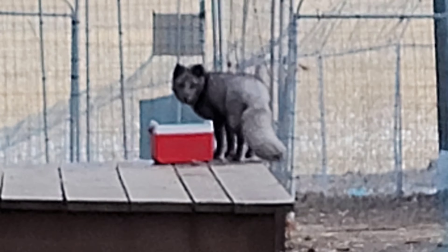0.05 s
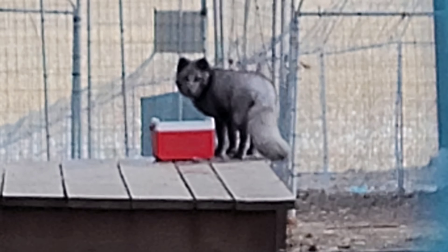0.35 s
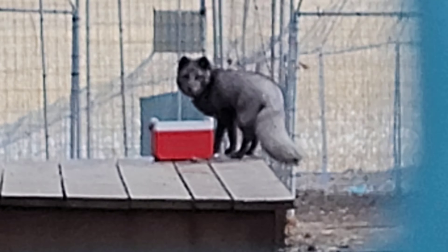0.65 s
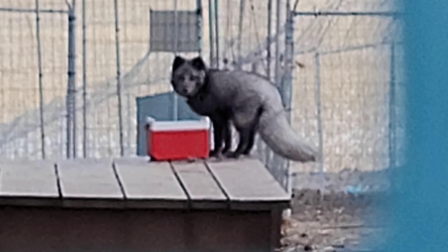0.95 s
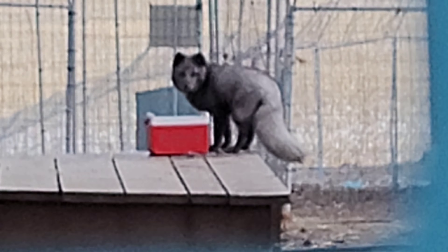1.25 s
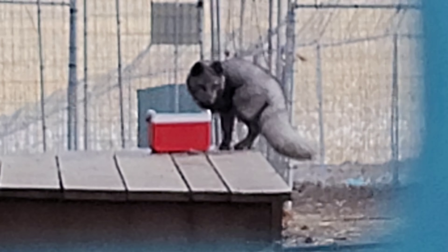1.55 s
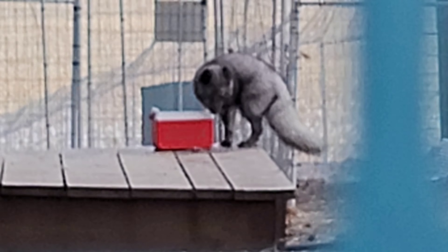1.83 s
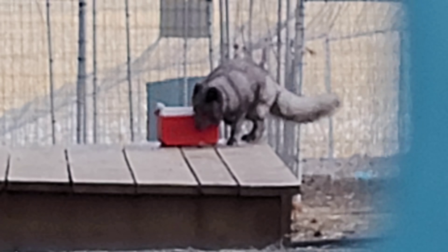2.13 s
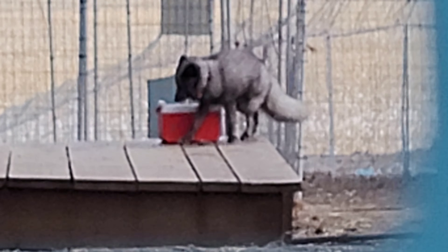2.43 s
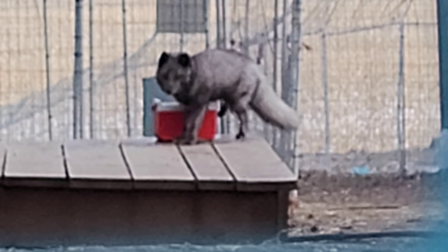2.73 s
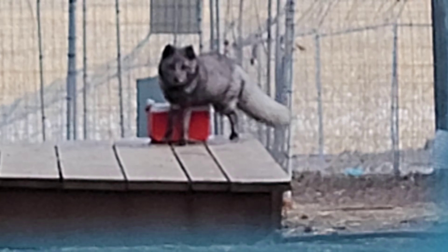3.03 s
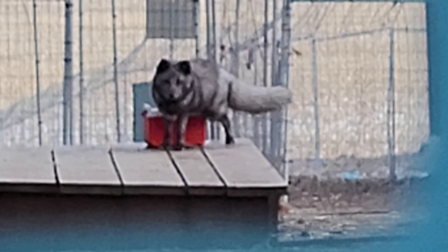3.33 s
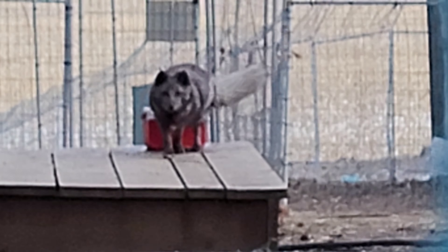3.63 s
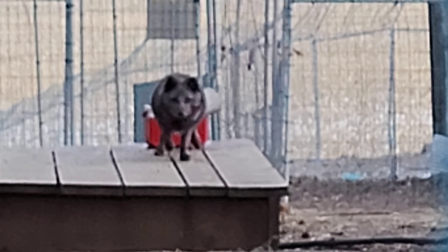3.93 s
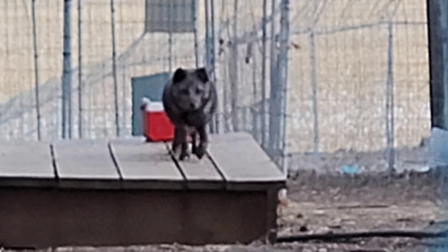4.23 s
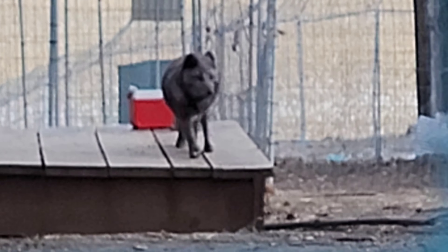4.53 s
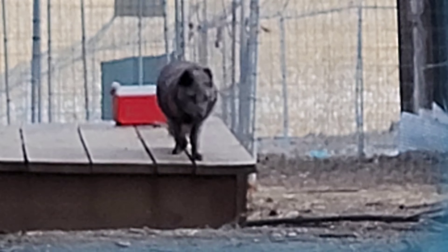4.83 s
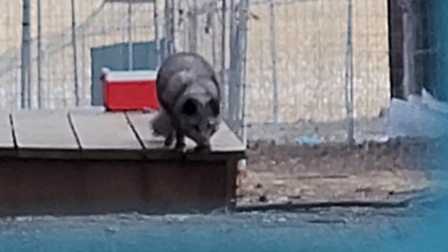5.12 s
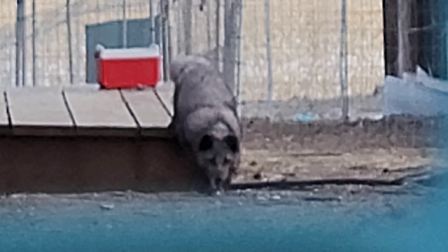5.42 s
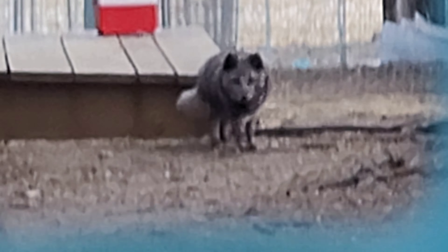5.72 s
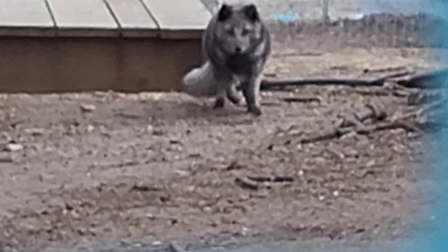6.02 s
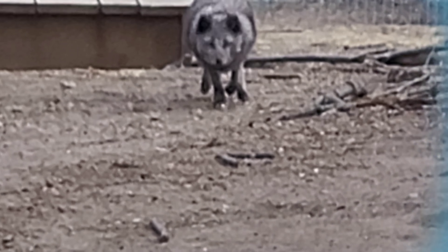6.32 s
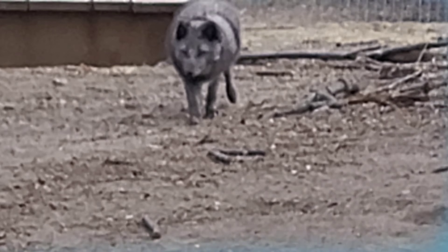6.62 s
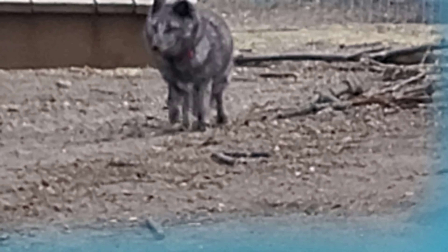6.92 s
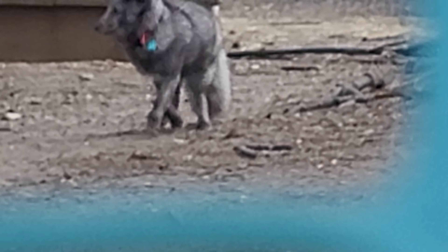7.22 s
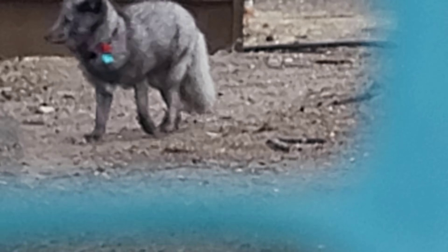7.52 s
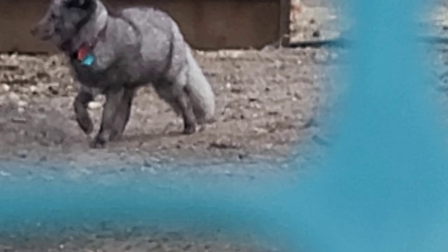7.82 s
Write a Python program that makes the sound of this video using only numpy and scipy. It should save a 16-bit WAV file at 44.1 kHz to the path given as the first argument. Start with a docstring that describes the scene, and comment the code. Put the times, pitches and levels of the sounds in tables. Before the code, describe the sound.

A fox screams seven times in an outdoor pen, a little to the left. Each shrill call scoops up, breaks into a rasp, clears and falls away, with a light echo off nearby walls. Low wind and handling rumble runs underneath, with a few dull knocks and a sharp dry tap. Later come faint collar tag ticks and tiny bird chips, and distant traffic swells on the right around the final scream.

```python
"""A fox screams seven times in an outdoor pen: each call rises, breaks into a rasp, clears and falls away.
Its vocal folds pass between a clean whistle and chaotic flapping.
The fox screams from the left, and nearby walls answer from both sides.
Air and handling rumble on the microphone while distant traffic swells on the right.
Around the screams come dull knocks, a few dry taps, the ticking collar tag and a small bird's chips."""
import sys
import numpy as np
from scipy import signal
from scipy.fft import rfft, irfft, next_fast_len
from scipy.io import wavfile
from scipy.ndimage import uniform_filter1d, map_coordinates

SR = 44100
rng = np.random.default_rng(int(sys.argv[2]) if len(sys.argv) > 2 else 0)


def to_wav(sig):
    """Store sig (one row per channel, or 1-D mono) as 16-bit WAV at the path in sys.argv[1].

    Samples outside -1..1 are clipped; the rate is SR.
    """
    pcm = np.clip(np.atleast_2d(sig), -1, 1) * 32767
    pcm = np.round(pcm).astype(np.int16)
    wavfile.write(sys.argv[1], SR, pcm.T)  # frames by channels


N = 355446
T = np.arange(N) / SR


def amp(db):
    """Decibels to gain."""
    return np.exp(np.asarray(db) * (np.log(10) / 20))


def unit(x):
    """Scale to rms 1."""
    return x / np.sqrt(np.mean(x ** 2) + 1e-20)


def steady(x):
    """Hold the running rms at 1."""
    return x / np.sqrt(np.abs(uniform_filter1d(x * x, size=1300)) + 1e-9)


def along(points, hz):
    """Read (freq_hz, value) points on a log frequency axis."""
    freqs, values = np.transpose(points)
    return np.interp(np.log(hz + 1), np.log(freqs + 1), values)


def curves(rows):
    """An automation curve for each column after the time."""
    times, *columns = np.transpose(rows)
    return [np.interp(T, times, column) for column in columns]


def wobble(rate):
    """A smooth random curve of rms 1, with rate knots a second."""
    knots = rng.standard_normal(int(N * rate / SR) + 4)
    fine = np.arange(0, len(knots) - 1, .125)
    return unit(np.interp(T * rate, fine, map_coordinates(knots, [fine])))


def filtered(x, response):
    """Filter x by a function of frequency."""
    size = next_fast_len(N + SR // 2)
    return irfft(rfft(x, size) * response(np.fft.rfftfreq(size, 1 / SR)), size)[..., :N]


def eq(x, spectrum):
    """Colour x with (freq_hz, gain_db) points."""
    return filtered(x, lambda hz: amp(along(spectrum, hz)))


def noise(spectrum, count=2):
    """Unrelated coloured noises of rms 1."""
    return unit(eq(rng.standard_normal((count, N)), spectrum))


def resonance(x, centre_hz, width_hz):
    """A resonance whose centre moves from sample to sample."""
    turn = np.exp(2j * np.pi * np.cumsum(centre_hz) / SR)
    pole = np.exp(-np.pi * width_hz / SR)
    return 2 * np.real(turn * signal.lfilter([1 - pole], [1, -pole], x / turn))


def add(track, start_s, sound):
    """Mix a short sound into the track."""
    part = track[..., round(start_s * SR):][..., :len(sound)]
    part += sound[:part.shape[-1]]


def bursts(rows, t60_s, spectrum):
    """A decaying burst of coloured noise for each (start_s, level_db) row."""
    blows, t = np.zeros(N), np.arange(SR // 4) / SR
    for start_s, level_db, *_ in rows:
        add(blows, start_s, amp(level_db - 60 * t / t60_s) * rng.standard_normal(len(t)))
    return eq(blows, spectrum)


def placed(x, lead_ms):
    """Pan by arrival time: the left microphone is reached earlier by lead_ms."""
    return filtered(x, lambda hz: np.exp(1j * np.pi * hz * lead_ms / 1000 * np.array([[1], [-1]])))


def effort():
    """The screams scoop up, strain, clear, sag and drop: their contours, mouth shapes and gate."""
    # one contour per scream: time_s, pitch_hz, level_db, roughness (0-1), second_harmonic_db, edge_db
    screams = [
        [(0, 1295, -38.5, 0.56, 0, -14.5), (0.09, 1282, -40.5, 0.1, 0, -14), (0.112, 1122, -43, 0.5, 0, -9),
         (0.14, 944, -60, 0.5, -2, -16)],
        [(0.455, 885, -45, 0, -27, -21), (0.495, 1036, -37, 0.15, -27, -18),
         (0.52, 1075, -39, 0.39, -22, -16.5), (0.57, 1145, -36.5, 0.77, -16, -17),
         (0.65, 1480, -37, 0.6, -6.5, -19.5), (0.74, 1415, -34.5, 0.6, -6.5, -22),
         (0.92, 1409, -42, 0.71, -10, -20.5), (1.01, 1289, -34.5, 0.29, -20, -24),
         (1.085, 1234, -43, 0.23, -5.5, -20), (1.13, 1047, -54, 0.5, -4, -10)],
        [(1.425, 1005, -48, 0.51, -14, -23.5), (1.49, 1253, -37.5, 0.97, -9, -18.5),
         (1.58, 1380, -40.5, 0.98, -4, -17.5), (1.67, 1411, -38.5, 0.74, -22, -12.5),
         (1.76, 1314, -37, 0.37, -18, -18.5), (1.85, 1262, -44, 0.4, -9, -20),
         (1.91, 1258, -30.5, 0.12, -14.5, -30), (2.0, 1240, -39, 0.23, -12, -24.5),
         (2.03, 1132, -51, 0.42, -3, -15)],
        [(2.395, 810, -59, 0.09, 3, -18), (2.425, 944, -52, 0.13, 2, -18), (2.452, 1180, -38, 0.18, -11, -20),
         (2.475, 1279, -33, 0.66, -13, -18), (2.53, 1397, -31.5, 0.84, -15, -16.5),
         (2.62, 1459, -30, 0.77, -7.5, -21), (2.72, 1341, -34.5, 0.38, -2, -17.5),
         (2.85, 1266, -38.5, 0.32, -7.5, -15.5), (2.92, 1179, -36.5, 0.5, -2, -21.5),
         (2.965, 880, -50, 0.51, 8, -20.5)],
        [(3.725, 950, -52, 0.8, -25, -16), (3.79, 1217, -29.5, 0.92, -23, -13),
         (3.87, 1301, -26, 0.89, -22, -20.5), (3.97, 1397, -29, 0.75, -7, -18.5),
         (4.04, 1339, -33.5, 0.46, -5.5, -14.5), (4.18, 1273, -39.5, 0.38, -0.5, -15),
         (4.28, 1159, -34, 0.38, -8.5, -19), (4.33, 901, -50, 0.52, 8, -29)],
        [(4.925, 915, -57, 0.07, -12, -7), (4.965, 1050, -39, 0.12, -12, -18), (5.0, 1170, -30, 0.42, -22, -24),
         (5.055, 1327, -32.5, 0.66, -12.5, -16), (5.11, 1288, -35.5, 0.38, -5, -19),
         (5.24, 1254, -39.5, 0.27, -10, -19), (5.31, 1148, -37.5, 0.44, -7.5, -20.5),
         (5.38, 940, -50, 0.35, 14, -16)],
        [(6.93, 950, -45.5, 0.82, -1, -9), (7.0, 1139, -29, 0.93, -15, -13.5), (7.08, 1231, -30, 0.94, -9, -13),
         (7.17, 1407, -30, 0.93, -11, -14), (7.26, 1418, -29.5, 0.72, -14, -15.5),
         (7.35, 1318, -35, 0.39, -3.5, -14), (7.52, 1237, -35, 0.4, -8.5, -17.5),
         (7.66, 1110, -40.5, 0.36, -3, -15), (7.76, 923, -45.5, 0.43, 7, -8)],
    ]
    # one mouth shape per scream: second_formant_db, third_formant_db, edge_top_db, snarl_db
    mouth_shapes = [(-0.5, 2.5, -2, -4), (-2.5, 4, 5, 6.5), (-1.5, -1, 6.5, -4), (-1.5, 2, -7.5, 4),
                    (-3, -5, -3, 3.5), (-3.5, -3, -1, -2), (-0.5, -4, -3, -2.5)]
    fade_s = 0.0036
    starts, ends = np.array([(rows[0][0], rows[-1][0]) for rows in screams]).T
    current = np.maximum(np.searchsorted(starts, T) - 1, 0)
    gate = np.clip(np.minimum(T - starts[current], ends[current] - T) / fade_s, 0, 1)
    return curves(np.concatenate(screams)), np.array(mouth_shapes)[current].T, gate


def puffs(phase):
    """Each opening of the vocal folds lets out a puff of random strength."""
    return (1 + 1.6 * np.cos(phase)) * rng.standard_normal(N) * amp(1.4 * wobble(420))


def harmonics(phase, partials):
    """A stack of (harmonic, level_db) partials, each wavering in strength on its own."""
    return sum(amp(db + 2 * wobble(25)) * np.sin(k * phase) for k, db in partials)


def throat(x, gains_db, strain_hz):
    """Three formants rise and sink with the pitch, each flaring and dropping out on its own."""
    # resonances at full strain: centre_hz, width_hz, level_db, pitch_tracking (Hz per Hz)
    formants = [(1369, 87, 2.5, 0.45), (2070, 265, -7.5, 0.42), (2890, 260, -13.5, 0.39)]
    # the short muzzle radiates little outside the formants: freq_hz, gain_db
    passband = [(400, -32), (750, -18), (1040, -21), (1190, 0), (2980, 0), (3250, -14), (7000, -30)]
    voiced = np.zeros(N)
    for k, (centre_hz, width_hz, level_db, tracking) in enumerate(formants):
        strength = amp(level_db + gains_db[k] + 2 * wobble(60))
        voiced += (-1) ** k * strength * resonance(x, centre_hz + tracking * strain_hz, width_hz)
    return unit(eq(voiced, passband))


def whistle(phase, doubling, second_db):
    """The clean voice: two harmonics that swell and falter."""
    # how well the muzzle radiates the whistle: freq_hz, gain_db
    muzzle = [(850, 3), (1050, -6.5), (1200, 0), (1500, 1.5), (2000, -2.5), (2500, -3), (2850, -0.5)]
    tone = doubling * harmonics(phase, [(1, 0), (2, second_db)])
    tone = steady(filtered(tone, lambda hz: np.clip((hz - 600) / 400, 0, 1)))
    return eq(tone, muzzle) * amp(3.3 * wobble(22) - 1.2)


def shrill_edge(phase, doubling, rough, strain_hz, snarl_db, top_db):
    """The upper harmonics blur into a snarl sooner than the low ones turn to rasp."""
    # upper partials: harmonic, level_db
    partials = [(3, -3), (4, 1), (5, -4), (6, -2)]
    # the mouth's treble colour: freq_hz, gain_db
    mouth = [(2900, -29.5), (3400, 3), (3900, -1.5), (4650, -1.5), (5200, 0.5), (5900, 0), (6700, -7.5),
             (7600, -17.5), (9000, -64.5)]
    blur = np.tanh(1.5 * rough)
    air = puffs(phase)
    snarl_hz = 4540 - 1.2 * strain_hz  # sinks as the pitch rises
    snarl = air + amp(snarl_db) * resonance(air, snarl_hz, width_hz=300)
    tone = steady(eq(doubling * harmonics(phase, partials), mouth))
    edge = np.sqrt(1 - blur) * tone + np.sqrt(blur) * unit(eq(snarl, mouth))
    top = filtered(edge, lambda hz: .5 + .5 * np.tanh((hz - 5960) / 400))
    return edge + (amp(top_db) - 1) * top  # high shelf


def jaw_hiss(phase, edge_level_db):
    """Air through the open jaws: a very faint hiss far under the shrill edge, swelling in short breaths."""
    # breaths: centre_s, half_width_s, level_db
    breaths = [(0.0, 0.11, -77.5), (.75, 0.054, -76), (1.02, 0.099, -71.5), (1.66, 0.075, -75),
               (1.88, .09, -78), (2.62, 0.1, -72), (4.04, 0.038, -62.5), (4.22, .09, -67),
               (7.29, 0.05, -68), (7.52, 0.15, -62.5)]
    # hiss colour: freq_hz, gain_db
    colour = [(7000, -36.5), (8000, -2), (8700, -3.5), (9700, -8.5), (10600, -10.5), (11800, -7.5),
              (14000, -6), (15800, -23.5)]
    surges = sum(amp(db) * np.exp(-.5 * ((T - s) / half_s) ** 2) for s, half_s, db in breaths)
    return (amp(edge_level_db - 30.5) + surges) * unit(eq(puffs(phase), colour))


def fox():
    """Vocal folds pass between a clean whistle and chaotic flapping."""
    contour, mouth_shape, gate = effort()
    pitch_hz, voice_db, rough, second_db, edge_db = contour
    middle_db, third_db, top_db, snarl_db = mouth_shape
    strain_hz = pitch_hz - 1392  # zero at full strain, the height of a scream
    # rough folds lose their pitch from one cycle to the next
    jitter = rough ** 2.6 * (.05 * wobble(500) + .04 * wobble(70)) + .003 * wobble(35)
    # the strained voice breaks back and forth between two nearby pitches
    breaks = .03 * rough ** 2 * np.tanh(4 * wobble(30))
    phase = 2 * np.pi * np.cumsum(pitch_hz * (1 + jitter + breaks)) / SR
    # alternate cycles grow unequal, which puts bands halfway between the harmonics
    doubling = 1 + .4 * rough ** 2 * np.cos(phase / 2 + 1.5 * wobble(250))
    rasp = throat(puffs(phase), (0, middle_db, third_db), strain_hz)
    clean = whistle(phase, doubling, second_db)
    chaos = rough ** 2.4
    body = amp(-0.5) * np.sqrt(1 - chaos) * clean + amp(-2) * np.sqrt(chaos) * rasp
    edge = shrill_edge(phase, doubling, rough, strain_hz, snarl_db, top_db)
    hiss = jaw_hiss(phase, voice_db + edge_db)
    rattle = amp(1.4 * rough * wobble(170))
    voice = amp(voice_db - 2.44) * body + amp(voice_db + edge_db - 4) * edge + hiss
    return voice * rattle * gate


def pen(x, lead_ms, wet_db, send_db=0):
    """Direct sound, reflections scattered by fences and walls, and a thin outdoor tail."""
    # decay of the tail: freq_hz, t60_s
    decay = [(300, 0.047), (1400, 0.55), (2600, 0.64), (6000, 0.27), (12000, 0.058)]
    # reflections from ground and walls: delay_s, level_db
    echoes = [(0.015, -14), (0.112, -26.5), (0.219, -33)]
    hz, t, bands = signal.stft(rng.standard_normal((2, SR)), SR, nperseg=256)
    _, tail = signal.istft(bands * amp(-60 * t / along(decay, hz)[:, None]), SR, nperseg=256)
    tail *= amp(wet_db) / np.linalg.norm(tail[0])
    for delay_s, level_db in echoes:
        scatter = rng.standard_normal((2, 256)) * np.hanning(256)
        start = round(delay_s * SR)
        tail[:, start:start + 256] += amp(level_db + wet_db + 5.5) * scatter / np.linalg.norm(scatter[0])
    wet = signal.fftconvolve((x * amp(send_db))[None], tail, axes=1)[:, :N]
    return placed(x, lead_ms) + wet


def mic_rumble():
    """Moving air and the hand shake the microphone, with a few strong buffets and short low bumps."""
    # the bed of moving air: time_s, deep_db, flutter_db
    bed = [(0.0, -41.5, -56), (0.61, -44.5, -49.5), (1.03, -39.5, -58), (1.19, -42.5, -57.5),
           (1.75, -46.5, -54), (2.15, -38, -51.5), (2.49, -37.5, -51.5), (3.3, -32.5, -48.5),
           (3.77, -43, -53.5), (4.98, -42.5, -55.5), (5.27, -43, -53), (5.46, -41.5, -53.5),
           (6.37, -38.5, -52.5), (6.58, -38.5, -48.5), (6.96, -45, -51.5), (7.23, -35, -48),
           (7.45, -39.5, -49), (8.06, -39.5, -48)]
    # strong buffets: centre_s, half_width_s, deep_db, flutter_db
    buffets = [(0.808, 0.045, -37, -48), (1.138, 0.054, -29.5, -47), (3.094, 0.068, -36, -31),
               (3.197, 0.02, -22, -39.5), (3.365, 0.046, -26, -35), (3.49, 0.052, -23.5, -44.5),
               (4.191, 0.044, -39, -77), (7.661, 0.083, -48.5, -52)]
    # low bumps: start_s, level_db, pitch_hz
    thumps = [(.167, -16, 56.7), (0.801, -14, 88.5), (0.958, -17.5, 67.8), (1.044, -17.5, 62),
              (1.381, -15, 64.8), (1.717, -15.5, 74.1), (1.932, -10, 69), (2.21, -13, 59.5),
              (2.829, -14, 60.8), (3.19, -10, 87), (3.359, -3.5, 94.2), (4.746, -15.5, 67.93),
              (5.075, -21, 72.6), (6.248, -16, 53), (6.634, -15.5, 104.4), (7.185, -13.5, 73.76),
              (7.6, -23.5, 125.7), (7.961, -35, 105)]
    # which side rumbles more: time_s, left_minus_right_db
    sway = [(0.0, 3.5), (0.45, 13), (0.99, -5), (1.41, 13.5), (1.66, -4.5), (2.06, 15.5), (2.56, 5.5),
            (6.37, -4.5), (6.73, 16.5), (6.93, -2), (7.88, 8), (8.06, -2)]
    # colours of the deep rumble and the flutter above it: freq_hz, gain_db
    deep_colour = [(12, -37.5), (20, -5), (53, 6), (81, 7), (101, 2.5), (140, -6), (200, -33.5), (260, -58),
                   (440, -120)]
    flutter_colour = [(90, -15), (160, 3.5), (230, -4), (320, -10.5), (500, -29), (900, -51.5), (2000, -97)]
    deep_db, flutter_db = curves(bed)
    sway_db, = curves(sway)
    gust_db = 2 * wobble(12)
    deep, flutter = amp(deep_db + 5 + gust_db), amp(flutter_db + 3.5 + gust_db)
    for centre_s, half_s, push_db, puff_db in buffets:
        swell = np.hanning(round(4 * half_s * SR))
        add(deep, centre_s - 2 * half_s, amp(push_db) * swell)
        add(flutter, centre_s - 2 * half_s, amp(puff_db) * swell)
    bumps, t, rise_s = np.zeros(N), np.arange(SR // 6) / SR, 0.013
    envelope = t / rise_s * np.exp(1 - t / rise_s)
    for start_s, level_db, pitch_hz in thumps:
        add(bumps, start_s, amp(level_db - 9) * envelope * np.sin(2 * np.pi * pitch_hz * t))
    air = amp(-0.5) * (deep * noise(deep_colour, count=3) + flutter * noise(flutter_colour, count=3))
    sides, centre = air[:2], air[2]
    return (sides + 0.5 * centre + bumps) * amp([sway_db / 2, -sway_db / 2])


def traffic():
    """Tyre noise from a road off to the right swells and brightens."""
    # the swell of the road: time_s, roar_db, sizzle_db
    swell = [(0, -69.5, -75.5), (3.5, -68, -82.5), (4.7, -58.5, -89), (6.15, -50.5, -82),
             (6.4, -48.5, -59.5), (6.62, -45, -61), (6.88, -50.5, -66.5), (7.5, -41.5, -51.5),
             (8.06, -46, -55)]
    # colours of the tyres' roar and sizzle: freq_hz, gain_db
    roar_colour = [(200, -31.5), (450, -4), (750, 2), (1000, 3.5), (1400, 2.5), (1800, -0.5), (2250, -3),
                   (2700, -7.5), (3500, -20), (5500, -26.5), (9000, -55.5), (15500, -55)]
    sizzle_colour = [(1800, -35), (2800, 9.5), (3400, 0), (4500, -7.5), (5600, -1.5), (6800, -5.5),
                     (9000, -30.5), (15500, -21)]
    roar_db, sizzle_db = curves(swell)
    roar = amp(roar_db + wobble(9)) * noise(roar_colour, count=3)
    tyres = roar + amp(sizzle_db) * noise(sizzle_colour, count=3)
    return placed(tyres[2], lead_ms=-0.543) + .5 * tyres[:2]


def still_air():
    """A faint, even outdoor hush."""
    # colour of the hush: freq_hz, gain_db
    colour = [(150, -8.5), (400, -2.5), (700, -6), (1100, -11.5), (2000, -17), (3500, -27), (6000, -30.5),
              (8000, -40), (15500, -38)]
    return amp(-57) * noise(colour)


def knocks():
    """Dull, short knocks with no ring."""
    # soft blows: start_s, level_db
    hits = [(0.444, -44.5), (1.409, -43), (2.095, -46.5), (3.466, -45.5), (3.701, -43.5)]
    # their dull body: freq_hz, gain_db
    body = [(120, -3.5), (330, 6.5), (700, -3.5), (1500, -33), (4000, -44.5), (9000, -59.5)]
    return amp(14) * bursts(hits, t60_s=0.092, spectrum=body)


def taps():
    """A hard, dry tap and its bounce; later a faint tick, and another faint tick of the collar tag."""
    # hard blows: start_s, level_db
    hits = [(2.0549, -22.5), (2.1256, -54), (3.16, -53.5), (5.807, -52)]
    # their bright body: freq_hz, gain_db
    body = [(300, -14.5), (900, -20), (1500, -17), (2600, -44), (3300, -10.5), (3650, -1.5), (4050, -6),
            (4400, -21), (5400, -19.5), (6300, -5.5), (6900, -22.5), (8000, -44), (12000, -56)]
    return amp(17) * bursts(hits, t60_s=0.023, spectrum=body)


def collar_tag():
    """The collar tag clicks against its ring, with a bright splash and a faint tinkle."""
    # contacts: start_s, click_db, ring_db
    hits = [(4.448, -55, -49.5), (4.516, -54, -68), (5.342, -54.5, -62), (5.415, -69, -62),
            (5.778, -39.5, -60), (5.806, -44, -66.5), (5.823, -77.5, -57), (5.871, -81, -62),
            (6.175, -64, -57.5), (6.415, -42.5, -52)]
    # the tag's ringing modes: pitch_hz, level_db, t60_s
    modes = [(8050, 7, 0.076), (7820, -6, 0.22)]
    # the splash of its dense high modes: freq_hz, gain_db
    splash = [(4000, -32), (9000, -42), (12000, -13), (14800, 12.5), (15800, -16.5)]
    track, t = np.zeros(N), np.arange(SR // 4) / SR
    for start_s, click_db, ring_db in hits:
        click = .4 * amp(-60 * t / .004) * np.diff(rng.standard_normal(len(t) + 1))
        ring = sum(amp(db + rng.normal(0, 0.91) - 60 * t / t60_s) * np.sin(2 * np.pi * hz * t)
                   for hz, db, t60_s in modes)
        add(track, start_s, amp(click_db) * click + amp(ring_db - 10) * ring)
    return track + amp(-14) * bursts(hits, t60_s=.15, spectrum=splash)


def bird():
    """A small bird chips in quick sweeps up and down, three scratchy and one pure."""
    # chips: start_s, length_s, first_hz, top_hz, last_hz, level_db, pitch_scatter (relative)
    chips = [(4.46, 0.024, 3730, 6780, 4050, -50, 0.044), (4.499, .013, 5380, 6690, 5060, -56, 0.04),
             (4.543, .026, 3950, 6530, 3720, -53, 0.055), (5.92, 0.024, 6920, 7730, 5070, -51.5, 0.0034)]
    song = np.zeros(N)
    for start_s, length_s, first_hz, top_hz, last_hz, level_db, scatter in chips:
        progress = np.linspace(0, 1, round(length_s * SR))
        scratch = np.interp(progress * length_s * 2500, np.arange(256), rng.standard_normal(256))
        sweep_hz = np.interp(progress, [0, .75, 1], [first_hz, top_hz, last_hz])
        pitch_hz = sweep_hz * (1 + 2 * scatter * scratch)
        arch = amp(level_db - 6.5 * (2 * progress - 1) ** 2)
        envelope = arch * signal.windows.tukey(len(progress), .2)
        add(song, start_s, envelope * np.sin(2 * np.pi * np.cumsum(pitch_hz) / SR))
    return song


def scene():
    """The fox on the left, small sounds close and fairly dry, the bird mostly reverb, over the beds."""
    small_sounds = pen(taps() + collar_tag(), lead_ms=0.087, wet_db=-23.5) + knocks()
    # the first scream rings on strongly; later screams echo a little less: time_s, send_db
    echo_send = [(0, 6), (0.08, -2.5), (0.12, 0), (2, -1.5), (4, -3.5), (8, -1.5)]
    screams = pen(fox(), lead_ms=0.4497, wet_db=-1.5, send_db=curves(echo_send)[0])
    chips = pen(bird(), lead_ms=0, wet_db=5)
    return screams + chips + small_sounds + mic_rumble() + traffic() + still_air()


def record(dry):
    """A brick-wall low-pass takes off the very top."""
    return filtered(dry, lambda hz: hz < 15800)


dry = scene()
out = record(dry)
to_wav(out)
```